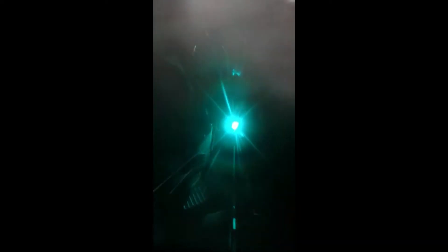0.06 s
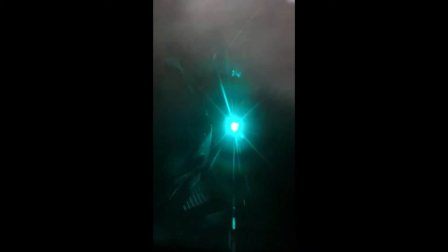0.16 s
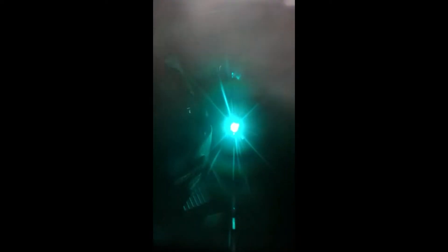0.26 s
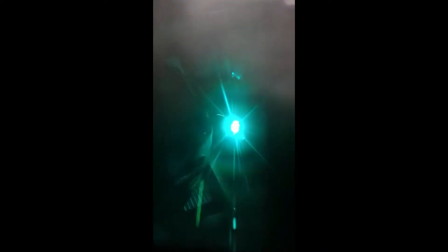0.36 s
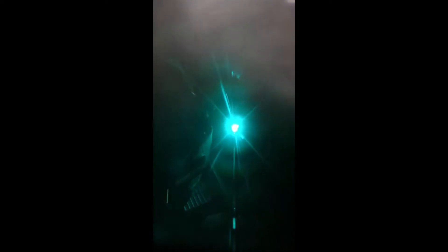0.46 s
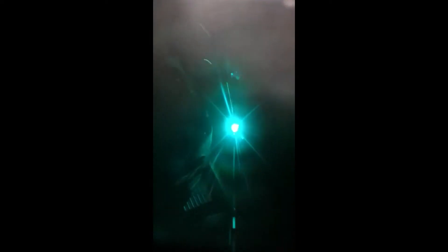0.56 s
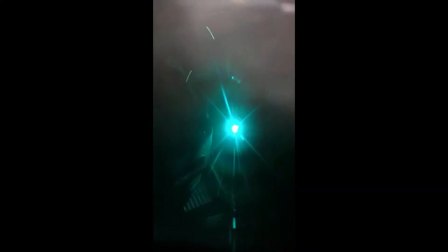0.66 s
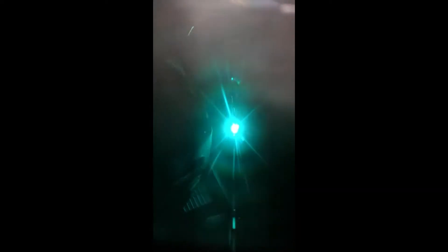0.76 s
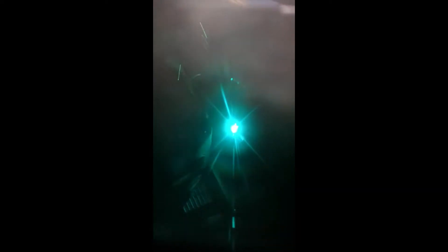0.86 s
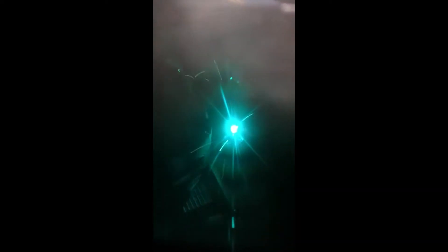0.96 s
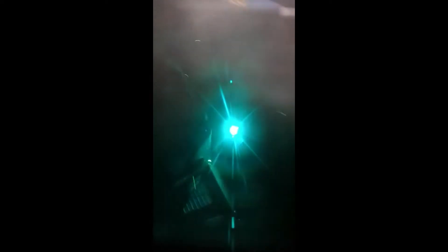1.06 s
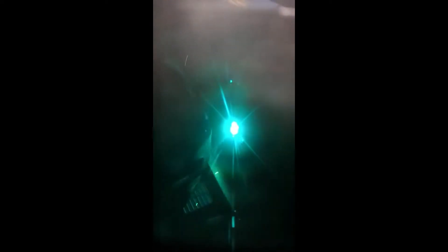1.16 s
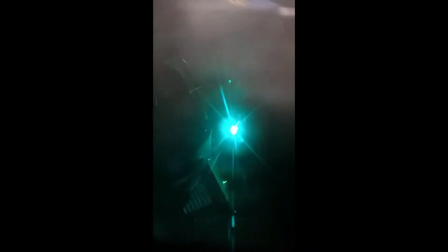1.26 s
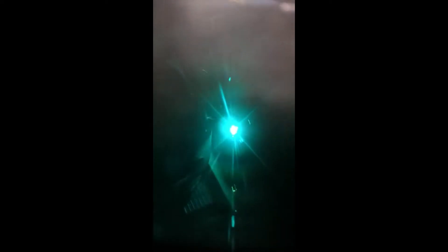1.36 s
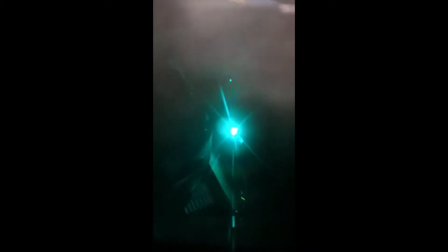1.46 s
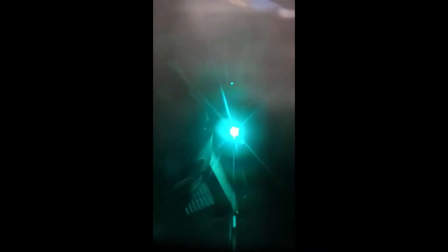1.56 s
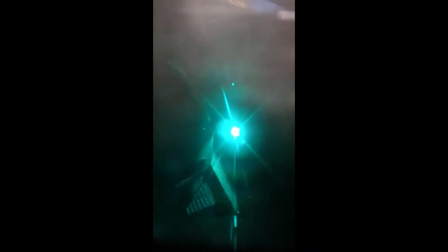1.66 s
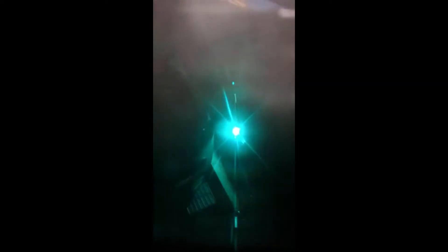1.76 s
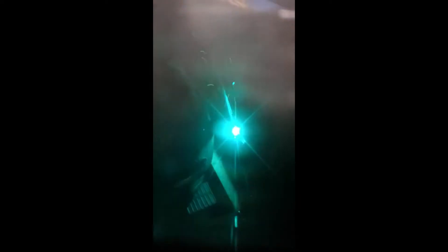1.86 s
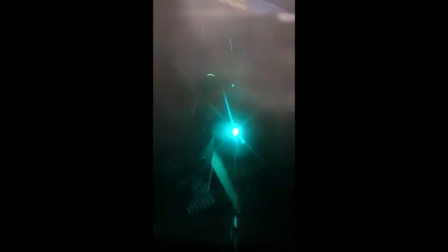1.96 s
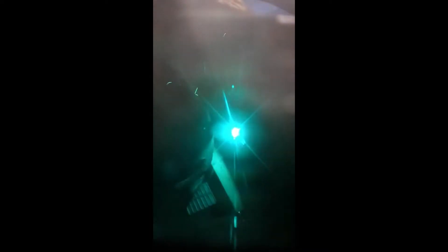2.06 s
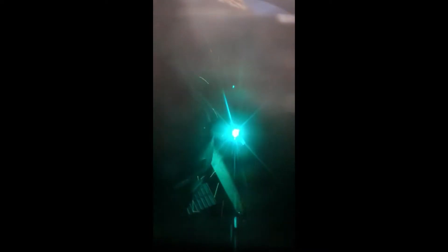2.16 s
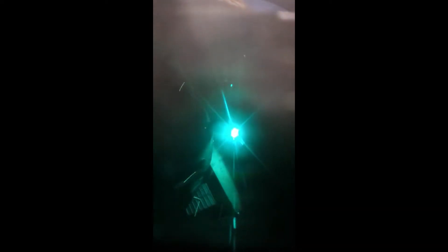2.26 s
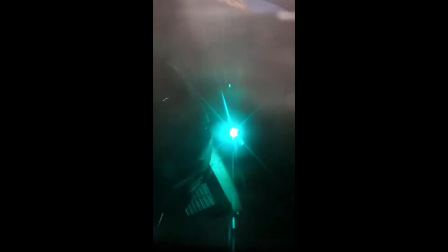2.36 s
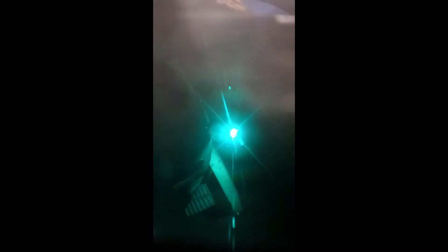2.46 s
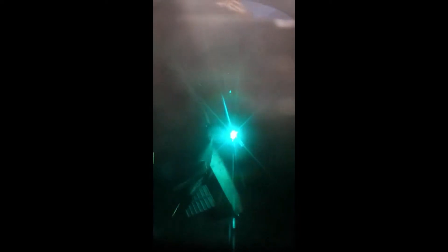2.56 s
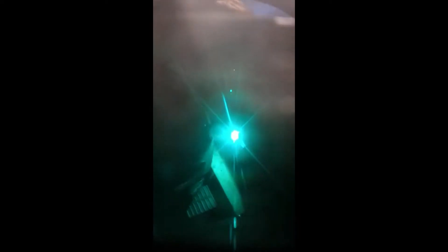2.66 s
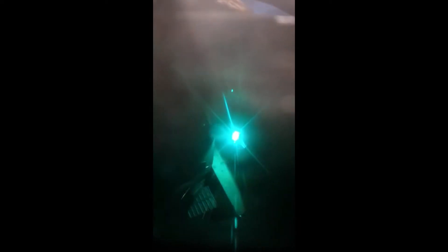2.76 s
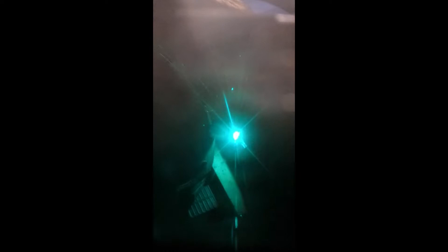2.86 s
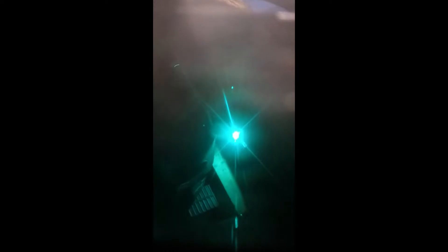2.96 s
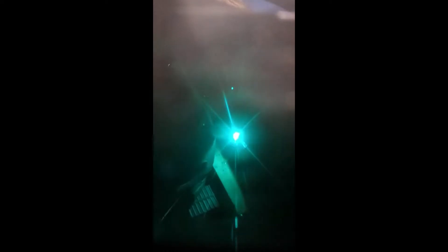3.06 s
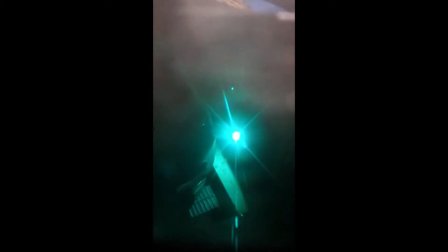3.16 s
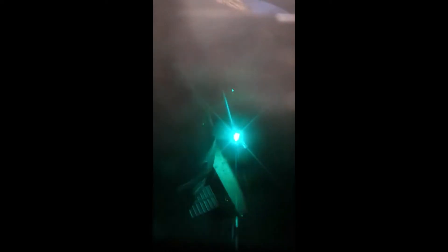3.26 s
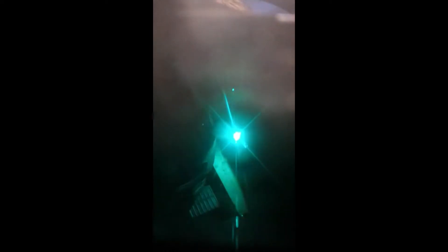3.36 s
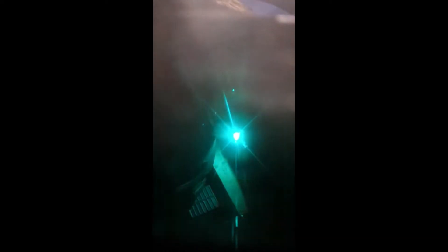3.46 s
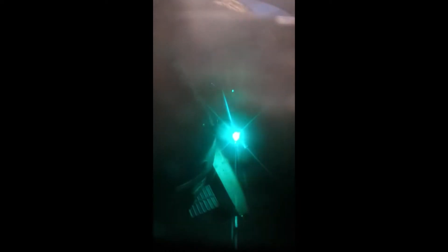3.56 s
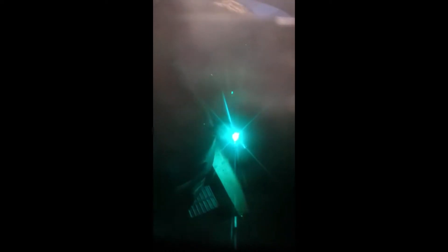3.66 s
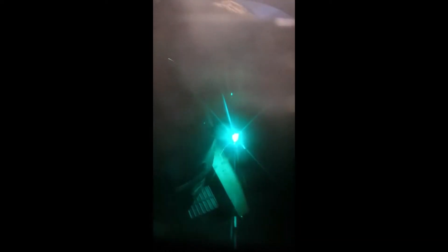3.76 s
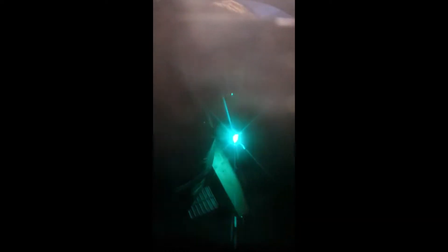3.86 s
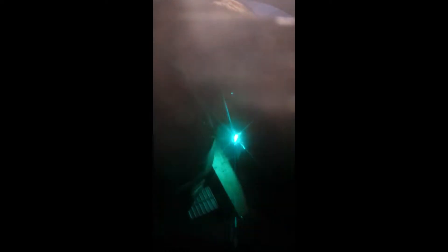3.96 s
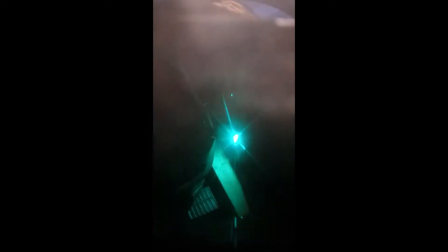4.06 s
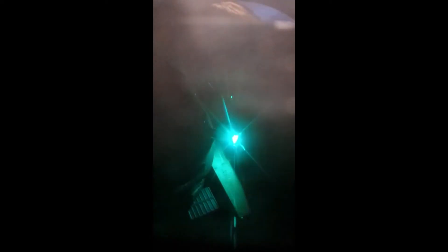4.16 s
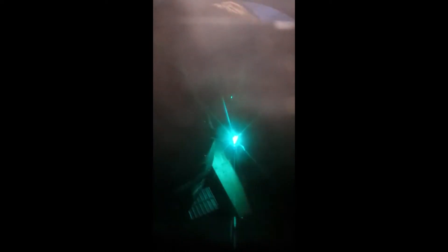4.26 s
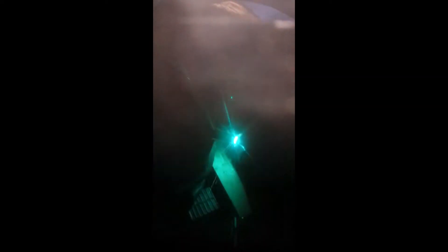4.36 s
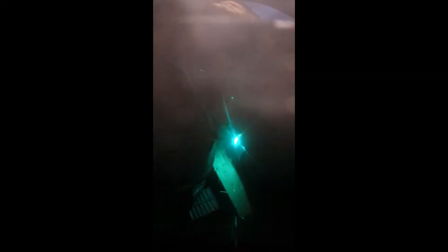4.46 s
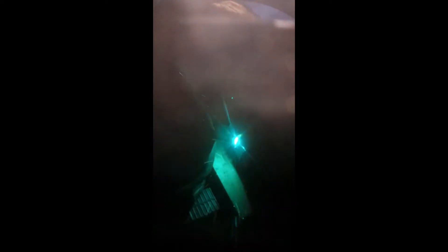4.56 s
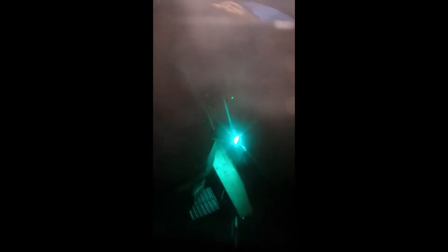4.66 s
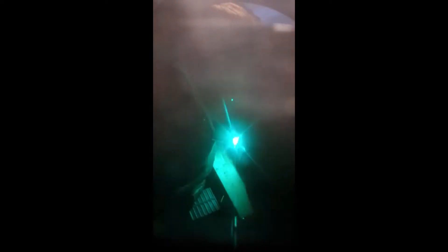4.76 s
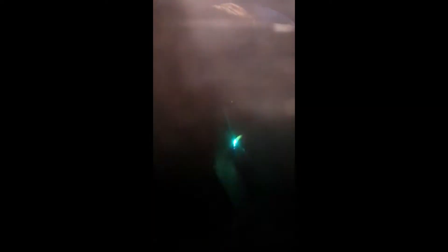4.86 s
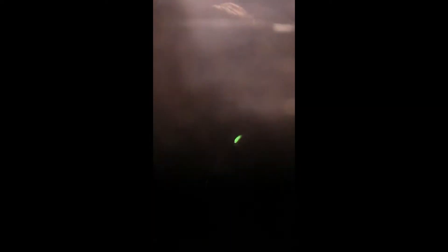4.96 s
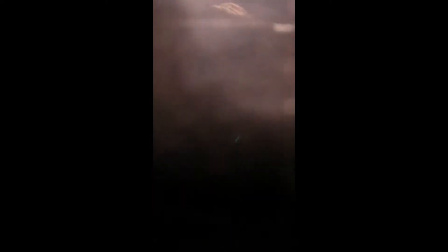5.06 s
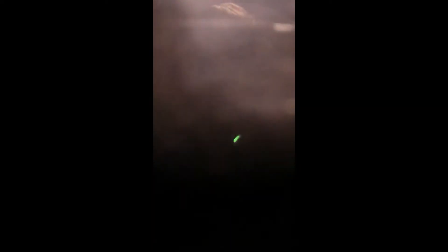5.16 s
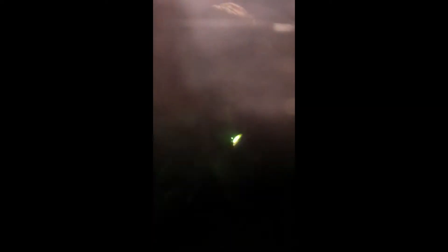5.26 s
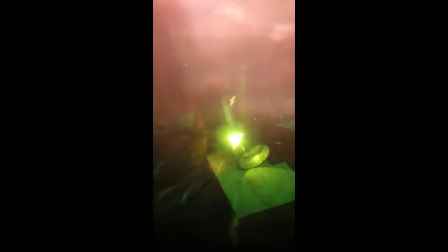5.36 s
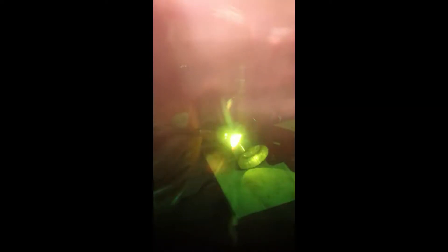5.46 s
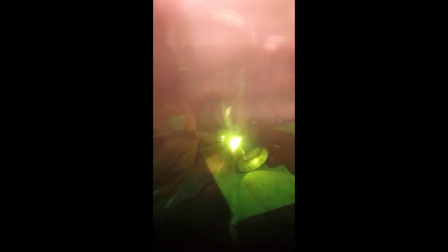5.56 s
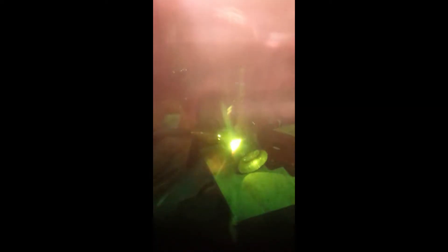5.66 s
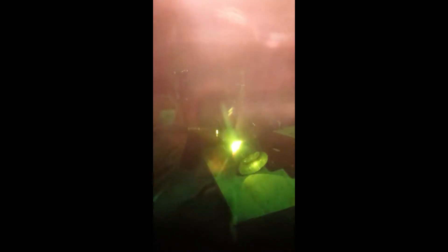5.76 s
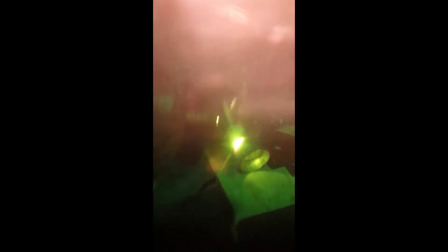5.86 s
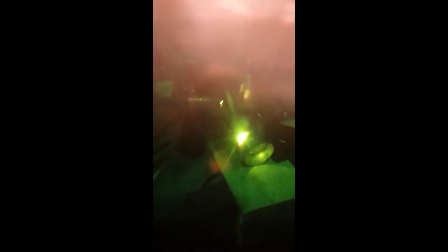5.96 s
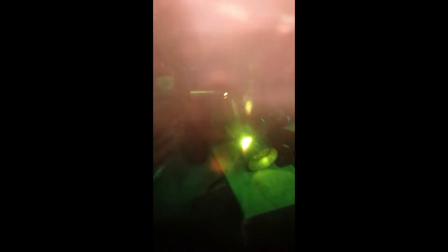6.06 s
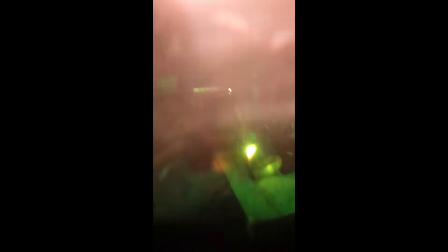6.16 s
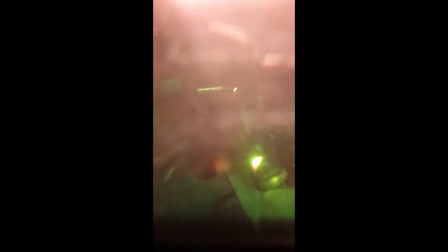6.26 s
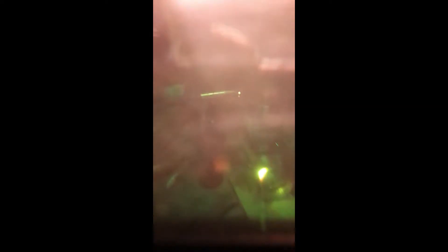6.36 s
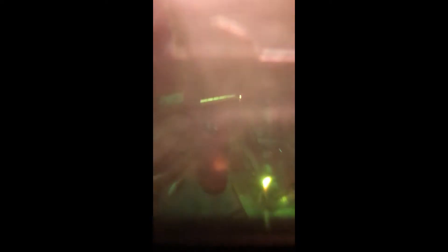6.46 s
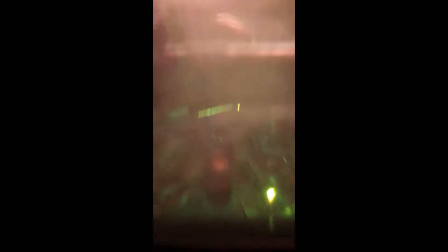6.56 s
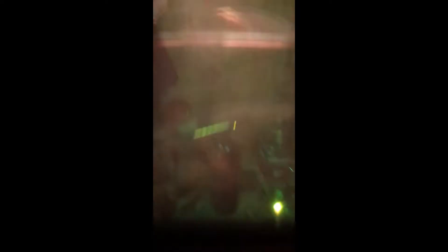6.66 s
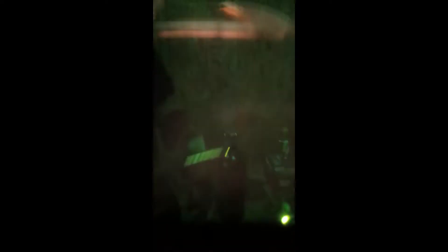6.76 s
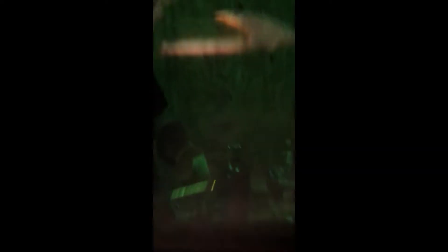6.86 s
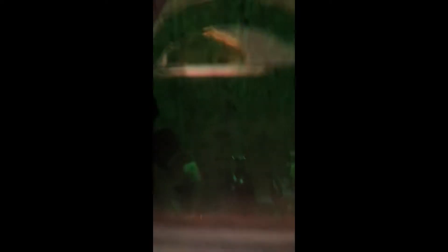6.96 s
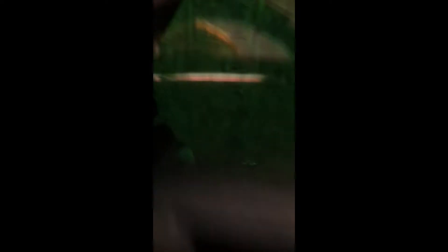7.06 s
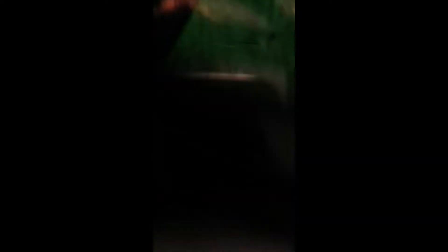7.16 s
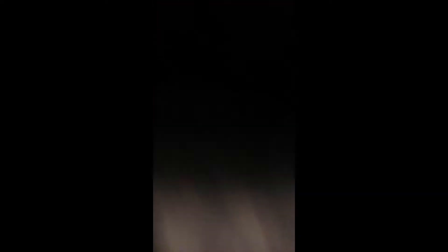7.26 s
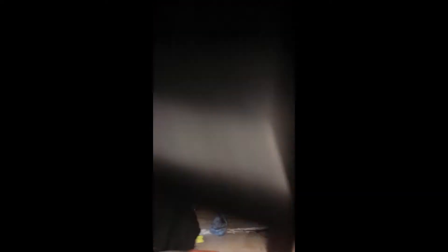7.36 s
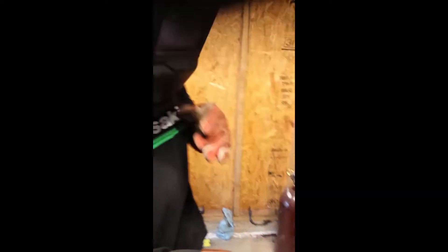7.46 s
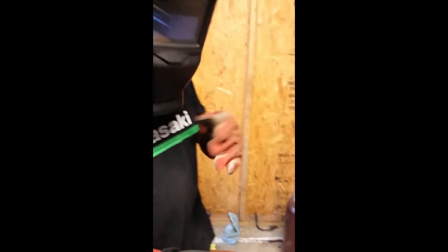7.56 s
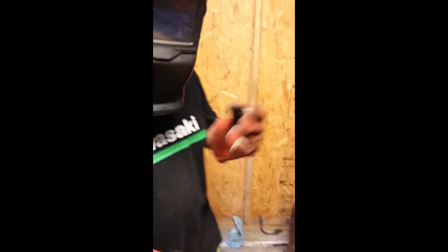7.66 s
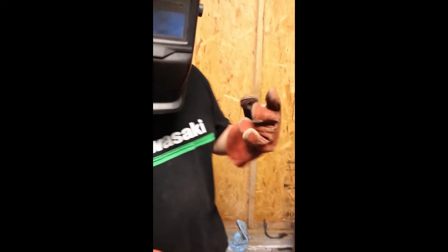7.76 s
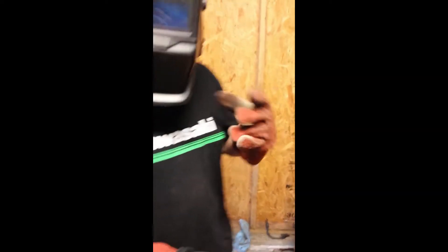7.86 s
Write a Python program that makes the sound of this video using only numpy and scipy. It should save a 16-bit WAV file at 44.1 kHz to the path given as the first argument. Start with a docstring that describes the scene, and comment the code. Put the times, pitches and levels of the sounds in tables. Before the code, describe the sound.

A welding bead is run on metal pipe, heard very close with a boxy, resonant colour and short room ring. Mains-paced crackle and hard snapping bursts continue nearly unbroken, then end abruptly. A moment of fizzing metal dies away; electrical hum and fan whir creep forward, and gloves and clothing scuff near the end, mostly on the left.

```python
"""A wire-feed welder runs a bead on scrap pipe, heard on two close microphones behind a hood in a small workshop.
The wire shorts and bursts in step with the rectified mains: loud pops (shaped noise bursts) and puffs over
small cracks (impulses) and a sizzle (rippling noise), all coloured by pipe, hood and room.
Beneath lie transformer hum (cosines) and a fan (blade tones and filtered air noise).
When the arc stops, gain control slowly lifts hum and fan; the bead ticks, and scuffs and a sleeve rustle follow."""
import sys
import numpy as np
from scipy import signal
from scipy.fft import rfft, irfft, next_fast_len
from scipy.io import wavfile
from scipy.ndimage import uniform_filter1d, minimum_filter1d

SR = 44100
rng = np.random.default_rng(int(sys.argv[2]) if len(sys.argv) > 2 else 0)


def file_out(sig):
    """Save sig as 16-bit WAV at sys.argv[1]."""
    # one column per channel
    cols = np.atleast_2d(sig).T
    # limit, then scale
    lim = np.clip(cols, -1, 1)
    pcm = np.round(lim * 32767).astype(np.int16)
    wavfile.write(sys.argv[1], SR, pcm)


N = 348390
TIME = np.arange(N) / SR
TAPS = 32768  # length of the filter design
HZ = np.fft.rfftfreq(TAPS, 1 / SR)

# the rectified mains, and the moment the arc goes out
RIPPLE_HZ, FIRST_CREST_S, ARC_OUT_S = 119.99, .0025, 4.958
# relative strength of the arc's sizzle; the small shorts follow it: time_s, level_db
SIZZLE = [(0.0, -18), (0.14, -24), (1.02, -23.5), (1.28, -27), (1.75, -23), (2.0, -26), (2.3, -24.5),
          (2.85, -25), (3.08, -27), (3.2, -26.5), (3.4, -25.5), (3.66, -27.5), (3.9, -27), (4.04, -23.5),
          (4.12, -33.5), (4.2, -26), (4.6, -27.5), (4.8, -28.5), (4.94, -37)]


def amp(db):
    """Amplitude factor of a level in dB."""
    return 10 ** (np.asarray(db) / 20)


def evened(x):
    """Scales x to rms 1."""
    return x / np.sqrt(np.mean(x ** 2) + 1e-20)


def curves(rows):
    """Each column of a time table, sample by sample."""
    s, *columns = np.transpose(rows)
    return [np.interp(TIME, s, c) for c in columns]


def read(rows, hz=HZ):
    """Each column of a frequency table, on a log axis."""
    f, *columns = np.transpose(rows)
    return np.array([np.interp(np.log(hz + 1), np.log(f), c) for c in columns])


def through(x, response):
    """Convolves x with one response a channel."""
    return signal.oaconvolve(np.atleast_2d(x), response, axes=1)[:, :N]


def coloured(x, db):
    """Causal minimum-phase filter with the given gain over HZ."""
    circle = np.concatenate([db, db[:, -2:0:-1]], axis=1)
    log_gain = circle * np.log(10) / 20
    spectrum = np.exp(np.conj(signal.hilbert(log_gain))[:, :len(HZ)])
    return through(x, irfft(spectrum)[:, :TAPS // 8])


def split(x, hz):
    """The parts of x below and above hz."""
    return [signal.sosfilt(signal.butter(3, hz, kind, fs=SR, output="sos"), x) for kind in ("low", "high")]


def drift(per_s):
    """Random wander of rms 1, with 2 * per_s new values a second."""
    values = rng.standard_normal(N)
    return evened(np.interp(2 * per_s * TIME, np.arange(N), values))


def diffuse(length):
    """Noise at two close microphones, alike in the bass."""
    # likeness of diffuse sound at the two microphones: frequency_hz, likeness (0-1)
    likeness = [(40, 0.7), (130, 1), (300, 1), (600, 0.72), (1000, 0), (2000, 0.04)]
    a, b = rfft(rng.standard_normal((2, next_fast_len(length, True))))
    same = np.clip(read(likeness, np.linspace(0, SR / 2, len(a)))[0], -1, 1)
    return irfft([a, same * a + np.sqrt(1 - same ** 2) * b])[:, :length]


def clicks(s, db):
    """Single impulses, each with the energy of 3 ms at its level."""
    at = np.clip(np.round(np.asarray(s) * SR).astype(int), 0, N - 1)
    return np.bincount(at, amp(db) * np.sqrt(.003 * SR), N)


def workshop(direct_db, hood_db, room_db, hood_delay_s=(.0016, .0004), hood_spread_s=(.0021, .0017)):
    """Response: direct sound, a quick clatter inside the hood, then the room; pairs are (left, right)."""
    # ring of the workshop: frequency_hz, t60_s
    ring = [(200, 0.44), (530, 0.39), (1400, 0.3), (3700, 0.25), (9700, 0.38), (15000, 0.06)]
    t = TIME[:SR // 2]
    column = lambda pair: np.array(pair)[:, None]
    # the left microphone gets the direct sound six samples late
    direct = np.array([signal.unit_impulse(len(t), 6), signal.unit_impulse(len(t))])
    clatter = diffuse(len(t)) * np.exp(-((t - column(hood_delay_s)) / column(hood_spread_s)) ** 2)
    # each frequency of the tail dies away at its own rate
    hz, frame_s, z = signal.stft(diffuse(len(t)), SR, nperseg=256)
    decay = amp(-60 * frame_s / read(ring, hz).T)
    tail = signal.istft(z * decay, SR, nperseg=256)[1][:, :len(t)]
    tail *= 1 - np.exp(-t / 0.0015)
    parts = zip((direct, clatter, tail), (direct_db, hood_db, room_db))
    mix = sum(column(amp(db)) * p / np.linalg.norm(p, axis=1, keepdims=True) for p, db in parts)
    paths = rfft(mix, TAPS)
    # the echoes comb the sound finely but leave its broad colour alone
    paths /= np.sqrt(uniform_filter1d(abs(paths) ** 2, size=160, axis=1))
    return irfft(paths)[:, :len(t)]


def fan():
    """Blade tones beat against the hum over a rush of air; the higher tones waver more."""
    # fan tones: multiple of the blade rate, level_db
    blades = [(1, -60), (2, -66), (3, -74.5), (4, -80.5), (5, -83)]
    # colour of the rushing air: frequency_hz, left_db, right_db
    rush_colour = [(29.7, -33.5, -25.5), (89.5, -11.5, -18), (134.4, -15, -12), (220, 3.5, -1),
                   (276, -5, -11), (329, 2, 3.5), (388, -9.5, -7), (514, -10.5, -5.5), (878, -7.5, -12),
                   (1270, -18, -22.5), (3080, -23.5, -28), (5930, -23.5, -35), (6770, -34, -31.5),
                   (12000, -43.5, -42), (15400, -48.5, -50.5)]
    # trims as the microphone comes out from behind the hood: time_s, rush_db, hiss_db, tones_db
    turn = [(0, 9, 6, -6), (5.6, 0.5, 3, 2), (6.1, 1, 5.5, 6), (6.4, -1, 3, 5), (6.95, 1.5, 2.5, 5.5),
            (7.3, -1.5, 3, 2.5), (7.9, -2.5, 3.5, 1.5)]
    # faint motor whine that fades as the microphone turns, ahead of the tone trim: time_s, level_db
    whine_level = [(0, -73), (5.7, -71.5), (6.3, -74.5), (6.8, -94), (7.9, -85)]
    blade_hz, whine_hz = 252.6, 864
    rush_db, hiss_db, tone_db = curves(turn)
    angle = 2 * np.pi * blade_hz * TIME + 0.16 * drift(per_s=4.6)
    tones = 0
    for k, db in blades:
        phase = round(k) * angle + 0.07 * (k - 1) * drift(per_s=22)
        tones = tones + amp(db + 0.69 * k * drift(per_s=8)) * np.cos(phase)
    whine_db = curves(whine_level)[0] + 2 * drift(per_s=3)
    whine = amp(whine_db) * np.cos(2 * np.pi * whine_hz * TIME)
    air = amp(-53.0) * evened(coloured(diffuse(N), read(rush_colour)))
    rush, hiss = split(air, 1800)
    return np.sqrt(2) * (tones + whine) * amp(tone_db) + rush * amp(rush_db) + hiss * amp(hiss_db)


def transformer():
    """The core hums at multiples of the ripple, harder while current flows."""
    # hum: multiple of the ripple, idle_db, loaded_db
    hum = [(1, -75.5, -57.5), (2, -53.5, -43), (3, -80, -54), (5, -86, -65.5)]
    # load while the arc burns: time_s, load (1 = usual)
    arc_load = [(0, 0.92), (3.55, 0.88), (3.85, 1.15), (4.95, 1.12)]
    load = uniform_filter1d((TIME < ARC_OUT_S) * curves(arc_load)[0], size=2000)
    waver = amp(2.0 * load * drift(per_s=24))
    tones = 0
    for k, idle_db, loaded_db in hum:
        level = amp(idle_db + load * (loaded_db - idle_db))
        tones = tones + level * np.cos(2 * np.pi * round(k) * RIPPLE_HZ * TIME)
    return waver * np.sqrt(2) * tones


def small_sounds():
    """Glove and sleeve scuff in grainy strokes of noise, and the hot bead ticks in filtered impulses."""
    # scuffs of glove and sleeve: start_s, level_db, rise_s, decay_s
    scuffs = [(6.51, -61, 0.013, 0.053), (6.622, -52, 0.021, 0.037), (6.94, -61.5, 0.04, 0.058),
              (7.15, -62, .004, .015), (7.268, -52, 0.017, 0.027), (7.854, -44, 0.0033, 0.014)]
    # colour of the cloth: frequency_hz, level_db
    cloth_colour = [(300, -21), (1500, 1), (2500, -3), (4000, 7), (5700, 7), (8000, -4), (12000, -5),
                    (15000, -16)]
    # ticks of the cooling bead: time_s, level_db ahead of the band filter
    bead_ticks = [(5.531, -39.5), (5.884, -74)]
    stroke = 0
    for s, db, rise, decay in scuffs:
        swell = np.clip((TIME - s) / rise, 0, 1)
        stroke = stroke + amp(db) * swell * np.exp(-np.maximum(TIME - s - rise, 0) / decay)
    grains = rng.standard_normal(N) * amp(3.0 * drift(per_s=400))
    fibres = evened(coloured(grains, read(cloth_colour)))[0]
    ticks = split(split(clicks(*np.transpose(bead_ticks)), 4800)[1], 6800)[0]
    response = workshop(direct_db=(-6, -6), hood_db=(-2, -2), room_db=(-8, -8))
    return through(stroke * fibres + ticks, response) * amp([[1], [-1]])  # left 1 dB up, right 1 dB down


def swish():
    """A sleeve rubs as the arm swings: uneven grainy noise, mostly on the left."""
    # swing of the arm, relative: time_s, level_db
    swing = [(0, -100), (6.7, -87), (7.1, -67), (7.25, -58), (7.36, -54.5), (7.5, -59), (7.63, -56),
             (7.76, -59), (7.9, -54)]
    # colour of the sleeve: frequency_hz, left_db, right_db
    sleeve_colour = [(1490, -20.5, -27.5), (2600, -11.5, -9.5), (3020, 0.5, -7), (4700, 2.5, -8.5),
                     (5900, -2.5, -15), (6700, -19.5, -11), (7750, -12, -7), (10060, -17.5, -22)]
    band = coloured(diffuse(N) * amp(1.9 * drift(per_s=300)), read(sleeve_colour))
    return evened(band) * amp(curves(swing)[0] - 5.0 + 1.6 * drift(per_s=18))


def arc_colour(depth, shift=0):
    """Gain over HZ at both microphones; depth scales and shift detunes the resonances above the bass."""
    # broad colour of the arc: frequency_hz, left_db, right_db
    broad = [(39.97, -43, -28.5), (85, -18, -26), (141, -12, -11), (402, -9, -7), (1150, -9, -4.5),
             (2340, -4, -9), (3020, -4.5, -7), (4760, -2.5, -3.5), (7440, -2.5, -1.5), (10400, -2, 1.5),
             (12100, -2.5, -5), (14050, -3.5, -1.5), (15300, -2.5, -13.5)]
    # resonances of pipe, hood and microphone ports: frequency_hz, width_hz, left_db, right_db
    resonances = [(154, 29, 9.5, 7.5), (224, 74, 12.5, 9.5), (308.4, 66, 13.5, 13.5), (569, 102, 8, 10),
                  (858.5, 177, 18, 5), (1211, 46, 11.5, -10.5), (1814, 290, 14.5, 6.5), (3184, 260, -9, -1),
                  (3602, 210, 8.5, 4), (4060, 250, 0, -2.5), (4970, 530, 7, 1), (5966, 1020, 10, -4),
                  (7500, 323, -3, 3.5), (7910, 410, 10.5, 3), (8550, 486, -11.5, 12.5)]
    colour_db = read(broad)
    for hz, width, left_db, right_db in resonances:
        scale, centre = (depth, hz * (1 + shift)) if hz > 700 else (1, hz)
        bell = 1 / (1 + (2 * (HZ - centre) / width) ** 2)
        colour_db = colour_db + scale * np.array([[left_db], [right_db]]) * bell
    return colour_db


def last_fizz():
    """The molten pool fizzes for a moment after the arc goes out: band-limited, fluttering noise."""
    # strength of the fizz ahead of its filters: time_s, level_db
    fizz = [(4.9, -88), (4.96, -49), (5.0, -38), (5.06, -41), (5.11, -51), (5.2, -67.5), (5.4, -110)]
    hiss = split(split(rng.standard_normal((2, N)), 700)[1], 10500)[0]
    return coloured(hiss * amp(curves(fizz)[0] + 1.49 * drift(per_s=180)), arc_colour(depth=1.0))


def stalled():
    """1 while the wire is stubbed into the pool and the arc is weak, else 0."""
    # stalls: relight_s, length_s
    stalls = [(0.263, 0.016), (0.345, 0.015), (0.576, .018), (0.671, 0.016), (0.93, 0.012), (1.1, .016),
              (1.162, 0.0098), (1.67, .02), (1.693, 0.0091), (1.716, .012), (1.888, 0.02), (2.098, .02),
              (2.35, 0.011), (2.693, 0.017), (3.211, 0.023), (3.275, 0.022), (3.443, 0.0077), (4.138, 0.03),
              (4.174, 0.016), (4.268, 0.013), (4.535, 0.019), (4.868, 0.019)]
    return 1. * np.any([(TIME > s - length) & (TIME < s) for s, length in stalls], axis=0)


def shorts(share=.38, lag_s=.0004, jitter_s=.0008, over_sizzle_db=13, spread_db=3.5, most_db=-13.5):
    """Bursts (s, crack dB, puff dB): the loud ones, and droplets shorting on a share of the free crests."""
    # the loudest bursts of the shorted wire, relative levels: time_s, crack_db, puff_db
    loud_bursts = [(0.0434, -10.5, -28), (0.0702, -11, -19), (0.0776, -7, -23.5), (0.1036, -2.5, -16.5),
                   (0.1333, -10.5, -33), (0.1418, -3, -32), (0.1678, -3, -28), (0.2606, -5, -22.5),
                   (0.267, -9, -34), (0.293, -9.5, -16), (0.301, -7, -18), (0.3255, -12.5, -26),
                   (0.3453, -3.5, -23), (0.3762, -7, -23), (0.4092, -7.5, -10), (0.4362, -1, -22),
                   (0.4444, -8, -29), (0.47, -16, -29), (0.4954, -11, -26), (0.5434, -8, -28),
                   (0.57, -5.5, -15), (0.578, -4, -25), (0.602, -5.5, -22), (0.612, -4, -28.5),
                   (0.6444, -2, -32), (0.735, -9, -32), (0.7449, -5, -20), (0.81, -4, -24),
                   (0.8523, -10.5, -23), (0.9363, -5, -19), (1.0217, -10, -18), (1.1012, -10.5, -24),
                   (1.1293, -6.5, -23), (1.1685, -6, -16), (1.2027, -3.5, -10), (1.2113, -5.5, -36),
                   (1.237, -5.5, -26), (1.26, -9, -36), (1.2938, -5, -31), (1.317, -5.5, -28),
                   (1.3346, -5, -30), (1.3613, -3.5, -29), (1.3945, -3.5, -27), (1.4087, -10, -44),
                   (1.4287, -7.5, -33), (1.4528, -8, -31), (1.4966, -8, -27), (1.5183, -8.5, -23),
                   (1.5413, -10, -32), (1.559, -7, -25), (1.6023, -7, -33), (1.677, -9, -26),
                   (1.693, -8, -24), (1.718, 1, -16.5), (1.7544, -13, -32), (1.7783, -10.5, -24),
                   (1.8018, -10, -25), (1.8197, -3, -18), (1.8422, -7.5, -35), (1.886, -7, -35),
                   (1.9074, -6.5, -22), (1.9765, -10, -28.5), (1.9958, -10, -27), (2.0132, -8.5, -32),
                   (2.0282, -17.5, -29), (2.0425, -5.5, -31), (2.0596, -9, -14), (2.101, -2, -22),
                   (2.109, -3, -28), (2.1433, -3.5, -17), (2.1622, -14.5, -25.5), (2.183, -6, -25.5),
                   (2.2, -3.5, -24.5), (2.2211, -8.5, -16.5), (2.2777, -9, -25), (2.2864, -12, -19),
                   (2.2937, -4.5, -32), (2.3021, -10, -37), (2.3113, -2.5, -24), (2.318, -10.5, -25),
                   (2.341, -12, -21), (2.3521, -3, -23.5), (2.4436, -7, -17), (2.4595, -6.5, -26),
                   (2.484, -10, -25), (2.5336, -15, -34), (2.5591, -10, -10.5), (2.586, -9, -17.5),
                   (2.5939, -5.5, -23), (2.6031, -7.5, -19), (2.6107, -4.5, -18), (2.6922, -7.5, -16.5),
                   (2.719, -9, -33), (2.7432, -8, -12), (2.7532, -4, -29), (2.7622, -6, -29),
                   (2.7872, -5, -26), (2.7947, -5, -20), (2.8033, -14, -31), (2.8285, -5.5, -13),
                   (2.8527, -15, -23), (2.8626, -4, -16), (2.8709, -11.5, -29), (2.884, -7, -33),
                   (2.8932, -5.5, -32), (2.9026, -4.5, -28), (2.9279, -9, -21), (2.9358, -6.5, -27),
                   (2.9926, -10, -24), (3.0852, -6.5, -22), (3.0948, -7.5, -35), (3.1022, -18, -24.5),
                   (3.1279, -6.5, -25), (3.215, -18, -15.5), (3.2374, -13, -19), (3.2786, -11.5, -21),
                   (3.3006, -6, -19), (3.359, -3.5, -16), (3.4128, -10, -34), (3.451, -9, -9.5),
                   (3.4622, -12, -27.5), (3.4925, -8, -20), (3.5207, -5, -30), (3.5455, -9, -21.5),
                   (3.57, -6, -17), (3.5784, -11, -26), (3.6016, -6.5, -21), (3.6125, -12, -27),
                   (3.626, -8, -24.5), (3.65, -10.5, -16.5), (3.6755, -5, -20), (3.6848, -14, -29),
                   (3.726, -9.5, -20), (3.744, -8, -17), (3.7518, -9, -24), (3.7776, -5.5, -37),
                   (3.7854, -2.5, -24), (3.813, -13, -20), (3.82, -12, -33), (3.8376, -9, -17),
                   (3.8946, -6.5, -18), (3.9369, -7, -16), (3.9448, -5, -22), (3.986, -7, -13),
                   (4.0115, -7.5, -31), (4.0198, -17, -21), (4.0448, -9, -20), (4.0893, -7, -22.5),
                   (4.135, -7.5, -13.5), (4.1438, -10, -34), (4.1697, -4.5, -15.5), (4.1774, -6, -33),
                   (4.195, -14, -27), (4.2242, -12, -20), (4.2781, -6.5, -18), (4.2956, -11, -16),
                   (4.311, -9, -22.5), (4.3179, -5, -29), (4.336, -7, -22), (4.3434, -5, -30),
                   (4.3522, -7.5, -39), (4.3782, -10.5, -18), (4.4018, -6, -12.5), (4.4263, -8, -11),
                   (4.4356, -4.5, -19), (4.4458, -7, -24), (4.5045, -7.5, -23), (4.538, -10, -13),
                   (4.5624, -4.5, -12.5), (4.5685, -8, -23), (4.5782, -11, -32), (4.595, -6.5, -21),
                   (4.6028, -10.5, -20), (4.6124, -11, -35), (4.6443, -8, -12), (4.6683, -8, -18),
                   (4.6784, -6.5, -16), (4.6916, -11, -23), (4.724, -7.5, -22), (4.7546, -9, -22),
                   (4.817, -9, -14.5), (4.8787, -8, -17), (4.921, -18, -26), (4.9282, -8.5, -18)]
    loud = np.array(loud_bursts) + [.0002, 0, 0]  # each falls 0.2 ms after its listed time
    crests = np.arange(FIRST_CREST_S, ARC_OUT_S - 1 / RIPPLE_HZ, 1 / RIPPLE_HZ)
    late, size, growth = rng.standard_normal((len(crests), 3)).T
    free = abs(crests[:, None] - loud[:, 0]).min(axis=1) > 1 / (2 * RIPPLE_HZ)
    # a droplet grows from crest to crest and falls when it is full
    droplets = np.floor(np.cumsum(free * share * (1 + np.tanh(growth) / 2)))
    falls = np.diff(droplets, prepend=0) > 0
    s = np.clip(crests + lag_s + jitter_s * late, 0, ARC_OUT_S)
    db = np.interp(s, *np.transpose(SIZZLE)) + over_sizzle_db + spread_db * size
    db = np.minimum(db, most_db)
    falls &= np.interp(s, TIME, stalled()) < .5
    small = np.column_stack([s, db, db - 11.5])[falls]
    return np.vstack([loud, small])


def pops(rows, swell_s=0.00022, burst_s=0.0002, necking_s=0.0015, spit_s=0.0005, spit_db=-16.0,
         low_db=-7, snap_db=12, variety_db=4):
    """The wire necks with a rising fizz, snaps, then spits metal; some bursts are quick, some drawn out."""
    lead = SR // 200
    t = np.arange(-lead, lead) / SR
    noise = rng.standard_normal((N // len(t), len(t)))
    stretch = amp(variety_db * np.clip(noise[:, :1], -2, 2))
    peak = lambda rise, fall: np.exp(np.minimum(t / rise, -t / fall))
    shape = peak(swell_s * stretch, burst_s * stretch) + amp(spit_db) * peak(necking_s, spit_s)
    spectra = rfft(shape * noise + amp(snap_db) * (t == 0))
    # every burst gets a flat spectrum and equal energy
    bursts = irfft(spectra / abs(spectra), len(t))
    force = np.zeros(N + 2 * len(t))
    for (s, db, _), burst in zip(rows, bursts):
        force[round(s * SR):][:len(t)] += amp(db) * np.sqrt(.003 * SR) * burst
    low, high = split(force[lead:lead + N], 3630)
    return high + amp(low_db) * low


def puffs(rows, rise_s=0.0011, fall_s=0.0036, puff_db=-0.8):
    """The arc relights with a short midrange puff of noise after every burst."""
    t = TIME[:SR // 20]
    strikes = np.bincount((rows[:, 0] * SR).astype(int), amp(rows[:, 2] + puff_db), N)
    puff = (1 - np.exp(-t / rise_s)) * np.exp(-t / fall_s)
    swell = through(strikes, puff[None])[0]
    return swell * evened(split(split(rng.standard_normal(N), 870)[1], 3260)[0])


def crackle(sizzle_db, crack_db=-3, spread_db=6.0, jitter_s=.0011):
    """Smaller shorts click near every crest of the supply ripple."""
    crests = np.arange(FIRST_CREST_S, ARC_OUT_S, 1 / RIPPLE_HZ)
    late, size = rng.standard_normal((len(crests), 2)).T
    db = np.interp(crests, TIME, sizzle_db) + crack_db + spread_db * np.minimum(size, 1.5)
    return clicks(crests + jitter_s * late, db)


def spatter(sizzle_db, per_s=560, spread_db=5.5, grain_db=9.5, bunching=.8):
    """Flecks of metal crack off the pool as impulses, most of them near the crests of the ripple."""
    rate = per_s * (1 + bunching * np.cos(2 * np.pi * RIPPLE_HZ * (TIME - FIRST_CREST_S)))
    size = amp(spread_db * np.minimum(rng.exponential(1, N), 3.5)) * rng.choice([-1, 1], N)
    flecks = (rng.random(N) < rate / SR) * size * amp(sizzle_db + grain_db)
    return split(flecks, 3150)[1]


def burning(rows, short_s=0.019, choke_db=3, after_db=-1.5, after_s=0.0071, full_pop_db=-0.5, stall_db=-9.5):
    """Gain of the arc: it chokes while the wire is shorted before a pop, dips less after it, sinks in stalls."""
    db = np.zeros(N + SR)
    lead = SR // 20
    t = np.arange(-lead, lead) / SR
    before = -choke_db * np.exp(-(t / short_s) ** 2)
    shape = np.where(t < 0, before, after_db * np.exp(-abs(t) / after_s))
    for s, pop_db, _ in rows:
        db[round(s * SR):][:len(t)] += min(amp(pop_db - full_pop_db), 1) * shape
    return amp(db[lead:lead + N] + stall_db * stalled()) * (TIME < ARC_OUT_S)


def weaving(source, paths, weave_per_s=1.3, count=8):
    """The gun weaves over the joint, so one pattern of echoes keeps giving way to the next."""
    place = count * weave_per_s * TIME + drift(per_s=2)
    heard = 0
    for k in range(count):
        near = np.maximum(1 - abs((place - k) % count - count / 2), 0)
        heard = heard + through(source * near ** .6, workshop(*paths))
    return heard


def arc():
    """Pops, cracks and the hiss of the plasma pass the hood and the room."""
    # midrange flutter of the molten pool, relative: time_s, level_db
    pool = [(0.0, -21), (0.16, -40.5), (1.99, -41), (2.35, -22), (2.38, -35), (2.87, -21.5), (3.03, -35.5),
            (3.82, -30), (3.85, -44), (4.04, -24), (4.13, -52), (4.14, -30), (4.21, -35.5), (4.44, -28.5),
            (4.53, -40), (4.57, -25.5), (4.8, -42), (4.94, -38)]
    # the resonances deepen as the gun travels along the pipe: time_s, share of the late colour (0-1)
    travel = [(0, 0), (1.8, 0.16), (2.5, 0.46), (3.5, 0.61), (4.9, 0.66)]
    # balance of echoes near the arc; rows are direct sound, hood clatter, room: left_db, right_db
    near_paths_db = [(-12, -3.5), (-0.5, -2.2), (-10.5, -16)]
    # the same for the distant sound, nearly all of it room: left_db, right_db
    far_paths_db = [(-40, -42), (-29, -25.5), (7, 19)]
    (sizzle_db,), (flutter_db,), bursts = curves(SIZZLE), curves(pool), shorts()

    ripple = np.cos(2 * np.pi * RIPPLE_HZ * (TIME - FIRST_CREST_S))
    unrest = np.tanh(drift(per_s=110))  # the steady wire feed keeps the arc from surging
    grains = rng.standard_normal(N) * amp(6.2 * np.minimum(drift(per_s=2000), 2))
    plasma = evened(split(grains, 3000)[1] * amp(1.7 * ripple + 5.6 * unrest))
    sizzle = plasma * amp(sizzle_db + 1.24)
    pool_noise = evened(split(rng.standard_normal(N), 4300)[0] * amp(6.3 * ripple + 5.2 * unrest))
    rumble, buzz = split(pool_noise, 488)
    # the pool's bass follows a part of the flutter's swell
    rumble_db = -28 + 0.3 * (flutter_db - flutter_db.mean())
    flutter = buzz * amp(flutter_db - 2.0) + rumble * amp(rumble_db)
    steady = crackle(sizzle_db) + spatter(sizzle_db) + sizzle + flutter
    source = amp(-3.5) * pops(bursts) + puffs(bursts) + steady * burning(bursts)

    heard = weaving(source, near_paths_db) * amp([[-2.9], [-2.1]])
    # the room's answer keeps one depth of resonance throughout
    room = coloured(weaving(source, far_paths_db), arc_colour(depth=0.91)) * amp([[-5], [-8]])
    # the upper resonances wander between two tunings as the gun weaves
    up = (1 + np.tanh(2 * drift(per_s=5))) / 2
    tunings = ((up, .006), (1 - up, -.006))
    wandering = lambda depth, db: sum(
        coloured(heard * share, arc_colour(depth, shift) + db) for share, shift in tunings)
    top_lift_db = 1.5 / (1 + (9540 / (HZ + 1)) ** 10)  # lifts the late colour above 9540 Hz
    early = wandering(depth=0.76, db=0) * amp([[1.1], [-.5]])
    late = wandering(depth=1.28, db=top_lift_db) * amp([[-1.3], [-.8]])
    deep = np.clip(curves(travel)[0], 0, 1)
    return (1 - deep) * early + deep * late + room


def scene():
    """All sources together at the two microphones."""
    return arc() + last_fizz() + transformer() + fan() + swish() + small_sounds()


def record(dry, threshold_db=-44, range_db=18, hold_s=0.68, recover_db_per_s=23):
    """Gain control holds low through the arc, waits, then creeps up; peaks round off; then the band limit."""
    power_db = 10 * np.log10(abs(uniform_filter1d((dry ** 2).mean(0), size=1500)) + 1e-12)
    cut_db = np.clip(power_db - threshold_db, 0, range_db)
    # the deepest cut of the past hold time stays in force
    hold = int(hold_s * SR)
    cut_db = -minimum_filter1d(-cut_db, hold, origin=(hold - 1) // 2)
    # the cut recovers no faster than the slope
    slope = recover_db_per_s * TIME
    cut_db = np.maximum.accumulate(cut_db + slope) - slope
    rounded = np.tanh(dry * amp(range_db - cut_db))
    low_pass = signal.firwin(401, 15600, window=("kaiser", 7), fs=SR)
    return signal.oaconvolve(rounded, low_pass[None], "same")


dry = scene()
out = record(dry)
file_out(out)
```